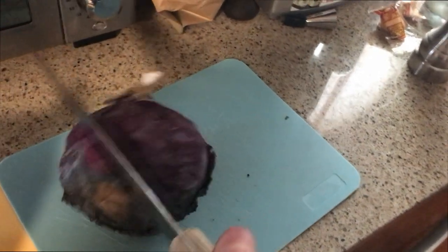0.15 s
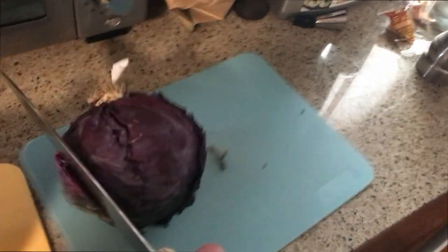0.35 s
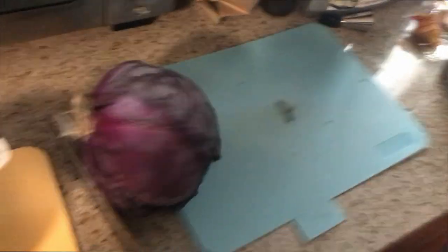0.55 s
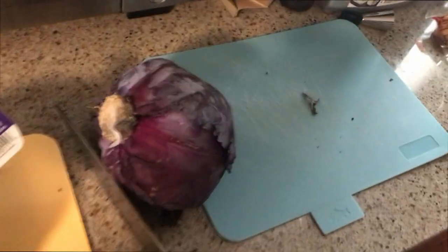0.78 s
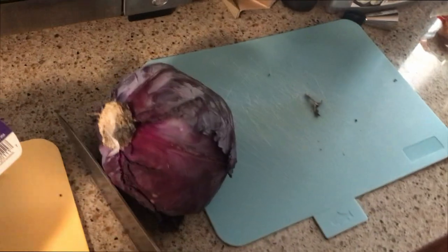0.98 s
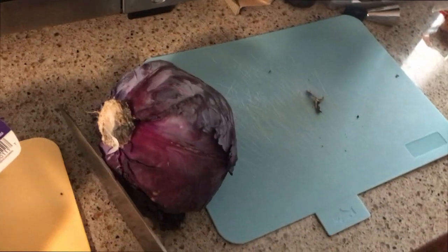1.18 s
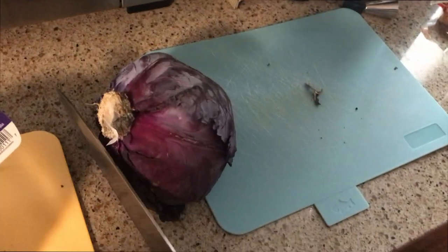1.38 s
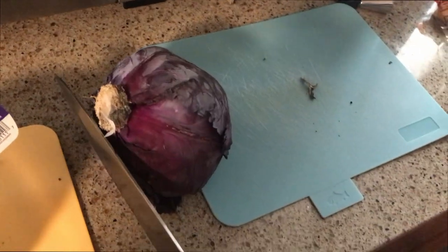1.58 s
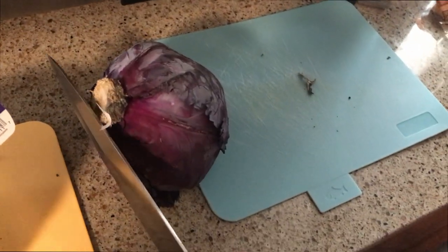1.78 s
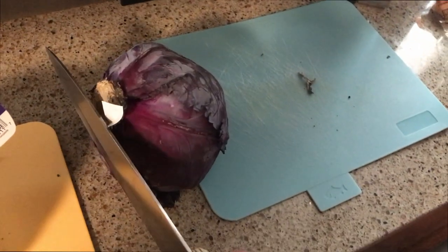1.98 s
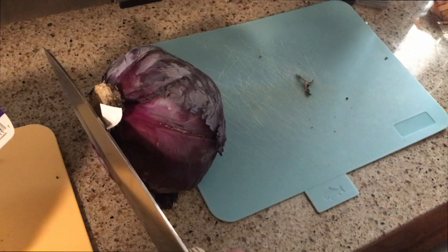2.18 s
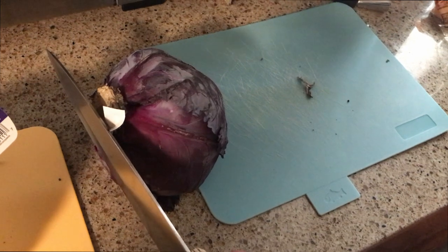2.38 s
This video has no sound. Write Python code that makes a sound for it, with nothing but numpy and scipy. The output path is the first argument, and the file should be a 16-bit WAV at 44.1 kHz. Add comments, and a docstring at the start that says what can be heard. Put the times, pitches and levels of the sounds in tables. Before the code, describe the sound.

Close up in a small kitchen with a low hum, a blade crunches and squeaks into cabbage, clacks loudly on the board, leaves tear and rustle, another sharp clack, then near quiet with tiny leaf creaks.

```python
"""A low hum and a gritty, squeaking crunch come first: a large knife splits a cabbage in a small kitchen.
The edge knocks hard on a plastic board and the steel rings; the cabbage rolls over with a rustle, then a second knock.
Leaves creak and tick faintly on the blade while the hum sinks in pitch. Coloured noise makes the air, clacks and ticks,
random grains the crunch, rustle and creak, decaying sines the ring and thud. A limiter holds down the knocks."""
import sys
import numpy as np
from scipy import signal
from scipy.fft import rfft, irfft, next_fast_len
from scipy.io import wavfile
from scipy.ndimage import uniform_filter1d, minimum_filter1d, map_coordinates

SR = 44100
rng = np.random.default_rng(int(sys.argv[2]) if len(sys.argv) > 2 else 0)


def waveform_to_disk(signal):
    """Save audio, clipped to [-1, 1], as 16-bit WAV at the path in sys.argv[1]."""
    frames = np.transpose(np.atleast_2d(signal))
    scaled = np.clip(frames, -1, 1) * 32767
    samples = np.round(scaled).astype(np.int16)
    wavfile.write(sys.argv[1], SR, samples)


N = 108045  # samples

# Level of the blade splitting the leaves: start_s, level_db
CUT_LEVEL = [(0, -53.5), (.02, -45.5), (.055, -42.5), (.1, -43), (.125, -39.5), (.148, -32), (.168, -35.5),
             (.184, -30), (.198, -40), (.215, -68)]
# Colour of splitting leaves and ribs: frequency_hz, relative level_db per Hz
CRUNCH_COLOUR = [(150, -9.5), (700, -10), (1600, -4), (2300, -2.5), (3300, 1.5), (5500, -3.5), (9000, -4.5),
                 (10500, -10), (13000, -4.5), (15500, -15)]
# Faint after-ring of the blade's free end: pitch_hz, t60_s, first_knock_db, second_knock_db
AFTER_RING = [(952, .42, -36, -45), (1781, .4, -40, -50), (7926, .4, -56, -50), (10840, .42, -46, -78),
              (11010, .4, -70, -58), (13400, .38, -70, -61)]

# random phase wobble roughens the ring of the steel
RING_WOBBLE_RAD, RING_WOBBLE_PER_S = 0.59, 100
SLOW_RISE_S = 0.0049  # build-up of the room, the after-ring, the tear and the brushes


def amp(db):
    """Decibels to gain."""
    return 10 ** (np.asarray(db) / 20)


def unit(x):
    """Scale to rms 1."""
    return x / np.sqrt(np.mean(x ** 2) + 1e-20)


def along(points, hz):
    """Interpolate (Hz, value) points on a log frequency axis."""
    point_hz, values = np.transpose(points)
    return np.interp(np.log(hz + 1), np.log(point_hz + 1), values)


def clock():
    """Time of each sample in seconds."""
    return np.arange(N) / SR


def curves(rows):
    """One value per sample for each column after the time."""
    s, *columns = np.transpose(rows)
    return [np.interp(clock(), s, column) for column in columns]


def wobble(rate):
    """A smooth random curve through rate knots a second."""
    knots = rng.standard_normal(N // 20)
    return map_coordinates(knots, [clock() * rate], mode="wrap")


def fade(s, t60, rise):
    """An envelope that rises at s and dies away by 60 dB in t60 seconds."""
    t = np.maximum(clock() - s, 0)
    decay = np.exp(-np.log(1000) * t / t60)
    return decay * (1 - np.exp(-t / rise))


def filtered(x, gain):
    """Multiply the spectrum of x by a gain that depends on frequency."""
    size = next_fast_len(N + SR // 2)
    hz = np.fft.rfftfreq(size, 1 / SR)
    return irfft(rfft(x, size) * gain(hz), size)[:N]


def tone(hz, wobble_rad=0):
    """A sine of random starting phase, roughened by a random phase wobble."""
    phase = 2 * np.pi * (hz * clock() + rng.random())
    return np.sin(phase + wobble_rad * wobble(RING_WOBBLE_PER_S))


def noise(spectrum, tilt_db=0):
    """Coloured noise of rms 1, tilted by tilt_db per octave."""
    def colour(hz):
        return amp(along(spectrum, hz) + tilt_db * np.log2(hz + 1))
    return unit(filtered(rng.standard_normal(N), colour))


def grains(spectrum, rate, spread_db):
    """Tiny fractures of uneven size at random moments, rate a second on average; rms 1."""
    happens = rng.random(N) < rate / SR
    size = amp(spread_db * np.clip(rng.standard_normal(N), -2, 2))
    pops = happens * rng.standard_normal(N) * size
    return unit(filtered(pops, lambda hz: amp(along(spectrum, hz))))


def patchy(x, depth_db):
    """Rubbing leaves sing briefly: random patches of time and pitch rise and fall in level; rms 1."""
    z = signal.stft(x, nperseg=256)[2]
    field = uniform_filter1d(rng.standard_normal(z.shape), size=3, axis=0)
    field = uniform_filter1d(field, size=3, axis=1)
    patches = amp(depth_db * np.clip(unit(field), -2, 2))
    return unit(signal.istft(z * patches, nperseg=256)[1][:N])


def kitchen(x):
    """The room's answer: a noise tail of unit energy in which each band dies at its own rate."""
    # Reverberation of the small room: frequency_hz, t60_s
    room_decay = [(120, 0.85), (250, 0.26), (500, .42), (1500, .5), (4000, 0.47), (8000, 0.31),
                  (11000, .33), (15000, 0.17)]
    hz, t, z = signal.stft(rng.standard_normal(SR), SR, nperseg=256)
    decay = np.exp(-np.log(1000) * t / along(room_decay, hz)[:, None])
    build = 1 - np.exp(-t / SLOW_RISE_S)
    tail = signal.istft(z * decay * build, SR, nperseg=256)[1]
    return signal.fftconvolve(x, tail / np.linalg.norm(tail))[:N]


def low_hum():
    """A wavering sine that sinks in pitch, its octave, and a higher hum that takes over."""
    # Low hum before its random waver: start_s, pitch_hz, level_db (rms)
    hum_track = [(0, 69.1, -40.5), (.18, 68.3, -42), (.35, 63.9, -44.5), (.53, 63.5, -37.5),
                 (.68, 62.23, -47), (.82, 60.6, -54.5), (.98, 61.27, -48.5), (1.1, 60.8, -51),
                 (1.36, 60.43, -51), (1.56, 59.5, -60), (1.95, 60.05, -57.5), (2.1, 60.88, -71),
                 (2.45, 59.9, -75)]
    octave_db = -19.5  # relative to the median level of the hum
    drone_s, drone_hz, drone_db, drone_rise_s = 1.93, 87.5, -61, 0.12
    hz, level_db = curves(hum_track)
    phase = 2 * np.pi * np.cumsum(hz) / SR
    hum = amp(level_db + .7 * wobble(12)) * np.sin(phase)
    octave = amp(np.median(level_db) + octave_db + 0.67 * wobble(18)) * np.sin(2 * phase)
    drone_swell = np.clip((clock() - drone_s) / drone_rise_s, 0, 1)
    drone = amp(drone_db + wobble(3.4)) * drone_swell * tone(drone_hz)
    return np.sqrt(2) * (hum + octave + drone)  # a sine of rms 1 peaks at root two


def room_air():
    """Steady room air as coloured noise, with a thin narrow-band hiss of the microphone."""
    # Colour of the room air: frequency_hz, relative level_db per Hz
    air_colour = [(20, -21.5), (32, -10.5), (48, 3), (110, 2.5), (180, -12), (350, -15), (700, -21.5),
                  (1500, -27.5), (4000, -31), (10000, -36.5), (15500, -36)]
    air_db = -61
    hiss_hz, hiss_half_width_hz, hiss_db = 12050, 220, -82.5

    def narrow(f):
        return 1 / (1 + ((f - hiss_hz) / hiss_half_width_hz) ** 2)
    hiss = unit(filtered(rng.standard_normal(N), narrow))
    return amp(air_db) * noise(air_colour) + amp(hiss_db) * hiss


def creaking():
    """The blade leans on the leaves: short noise ticks, and soft swells of grains as they rub."""
    # Leaves ticking against the blade: start_s, level_db, treble_tilt_db per octave
    tick_list = [(1.4498, -55.5, 4.5), (1.6614, -61, 2), (1.684, -46, -12), (1.6949, -50, 11),
                 (1.717, -52, 1), (1.7352, -58, -7), (1.741, -58, 4), (1.758, -54, -2), (1.7765, -52, 4),
                 (1.783, -59, 3), (1.803, -53, -5.5), (1.8101, -47.5, -1), (2.0095, -55, 3),
                 (2.016, -56, 3), (2.0715, -56.5, 4), (2.0954, -46.5, 0), (2.1105, -52, 1),
                 (2.1786, -50, -1)]
    # Colour of a tick before its tilt: frequency_hz, relative level_db per Hz
    leaf_colour = [(100, -37), (600, -28), (1900, -14), (2750, 3.5), (3500, 4), (4200, -9), (4800, -7),
                   (5800, 5.5), (7800, 1.5), (10500, -11.5), (12800, -1.5), (15500, -18)]
    # Leaves rubbing the blade: centre_s, half_length_s, level_db
    rub_list = [(.602, .008, -63), (1.208, 0.024, -73), (1.409, 0.034, -72.5), (1.594, .03, -69.5),
                (1.692, .018, -69), (1.764, 0.061, -70), (2.08, .03, -75), (2.33, 0.044, -81)]
    # Colour of the rubbing: frequency_hz, relative level_db per Hz
    rub_colour = [(100, -35), (500, -18), (1500, -10.5), (2800, 3), (5500, -7), (9000, -8), (15000, -15)]
    tick_t60_s, tick_rise_s = .013, 0.00031
    ticks = sum(amp(db) * fade(s, tick_t60_s, tick_rise_s) * noise(leaf_colour, tilt_db)
                for s, db, tilt_db in tick_list)
    rub_level = sum(amp(db) * np.exp(-((clock() - s) / half) ** 2) for s, half, db in rub_list)
    return ticks + rub_level * grains(rub_colour, rate=1100, spread_db=2.5)


def brushes():
    """The blade brushes the cabbage; soft touches wake only two low modes of the steel."""
    # Soft touches: start_s, level_db
    touch_list = [(.412, -44.5), (.572, -55.5)]
    level = sum(amp(db) * fade(s, .2, SLOW_RISE_S) for s, db in touch_list)
    lower_mode = tone(AFTER_RING[0][0], RING_WOBBLE_RAD)
    upper_mode = tone(AFTER_RING[1][0], RING_WOBBLE_RAD)
    return level * (lower_mode + amp(-0.5) * upper_mode)


def rolling():
    """The cabbage rolls over: waxy outer leaves rustle and chirp over the board as patchy grains."""
    # Rustle of the roll: start_s, level_db
    roll_level = [(.37, -66), (.415, -46.5), (.435, -47), (.453, -42.5), (.475, -51), (.51, -65.5),
                  (.62, -68.5), (.65, -58.5)]
    # Colour of the rustle: frequency_hz, relative level_db per Hz
    rustle_colour = [(200, -11), (900, -5), (1800, 2.5), (3200, -6.5), (6000, -1), (7500, -10), (9400, -7),
                     (10600, -17.5), (15000, -16.5)]
    level_db, = curves(roll_level)
    moving = (clock() > roll_level[0][0]) & (clock() < roll_level[-1][0])
    rustle = patchy(grains(rustle_colour, rate=4000, spread_db=3), depth_db=6)
    return amp(level_db) * moving * rustle


def tearing():
    """Loose leaves tear away after the first knock: a dying burst of bright grains."""
    # Colour of the tear: frequency_hz, relative level_db per Hz
    tear_colour = [(300, -13), (2000, -2), (6000, 0), (9000, 1.5), (11000, -1), (15500, -5.5)]
    start_s, level_db, t60_s = 0.25, -32.5, 0.21
    envelope = amp(level_db) * fade(start_s, t60_s, SLOW_RISE_S)
    return envelope * grains(tear_colour, rate=3000, spread_db=3)


def snapping():
    """Single ribs snap: short bursts of patchy, slightly darkened crunch noise."""
    # Ribs snapping: start_s, level_db
    snap_list = [(0.0313, -37), (0.0428, -23.5), (0.0842, -36), (.0890, -38.5), (0.1481, -26.5),
                 (0.158, -25.5), (0.1828, -31.5), (.310, -30), (0.362, -60.5), (.383, -40), (.444, -38.5),
                 (0.457, -42.5)]
    level = sum(amp(db) * fade(s, .014, rise=0.00014) for s, db in snap_list)
    return level * patchy(noise(CRUNCH_COLOUR, tilt_db=-1.14), depth_db=2)


def squeaking():
    """Wet leaves grip the steel and squeak: a narrow noise band around a rising pitch."""
    # Squeak: start_s, pitch_hz, level_db
    squeak_track = [(0, 2300, -63.5), (.016, 2300, -48), (.056, 2350, -45), (.075, 2900, -54.5),
                    (.12, 3100, -50.5), (.15, 3250, -41.5), (.19, 3250, -43), (.21, 3200, -70.5)]
    width_hz = 400
    hz, level_db = curves(squeak_track)
    phase = 2 * np.pi * np.cumsum(hz) / SR
    return amp(level_db) * (wobble(width_hz) * np.sin(phase) + wobble(width_hz) * np.cos(phase))


def crunching():
    """The blade splits the leaves in a gritty stream of tiny fractures."""
    level_db, = curves(CUT_LEVEL)
    return amp(level_db) * patchy(grains(CRUNCH_COLOUR, rate=7000, spread_db=2), depth_db=3.5)


def cutting():
    """Crunch and squeak stop together as the cut ends; snaps and the tear follow their own times."""
    blade_in_cabbage = clock() < CUT_LEVEL[-1][0]
    return (crunching() + squeaking()) * blade_in_cabbage + snapping() + tearing()


def edge_contacts():
    """The hard edge bounces on the board: sudden noise bursts with a little of the room."""
    # Contacts of the edge: start_s, level_db, t60_s
    contact_list = [(0.1996, -5.5, .008), (0.2017, -10.5, .014), (0.2276, -20, .07), (0.6523, -17.5, .006),
                    (0.688, -44.5, .025)]
    # Colour of a contact: frequency_hz, relative level_db per Hz
    edge_colour = [(300, -17), (1200, -2.5), (2800, 0), (6000, -0.5), (9000, 0.5), (10500, -9),
                   (15500, -11.5)]
    level = sum(amp(db) * fade(s, t60, rise=.0001) for s, db, t60 in contact_list)
    edge = noise(edge_colour) * level
    return edge + amp(-17) * kitchen(edge)


def counter_thud(s):
    """The counter answers a knock with a few low decaying modes."""
    # Modes of the counter: pitch_hz, relative level_db, t60_s
    counter_modes = [(117.7, -5, 0.26), (143.6, -2, .22), (201, -10.5, .25), (262, -9, .18)]
    return sum(amp(db) * tone(hz) * fade(s, t60, rise=0.0099) for hz, db, t60 in counter_modes)


def board_clack(s, t60, tilt_db):
    """The plastic board on the counter clacks: a coloured noise burst."""
    # Colour of the board before its tilt: frequency_hz, relative level_db per Hz
    board_colour = [(30, -35), (100, -17.5), (190, -12.5), (280, -6.5), (420, -0.5), (560, -6), (740, -3.5),
                    (950, 3.5), (1300, -3.5), (1600, 4), (2400, 1), (3200, -0.5), (4800, -3.5), (6300, -1),
                    (8500, -7.5), (10500, -12.5), (15000, -15)]
    return noise(board_colour, tilt_db) * fade(s, t60, rise=0.000067)


def blade_ring(knock, s, rise):
    """The steel rings in many modes, excited differently at each point of contact."""
    # Modes of the blade: pitch_hz, t60_s, relative first_knock_db, relative second_knock_db
    blade_modes = [(952, .035, -11.5, -11.5), (941.5, .1, -10.5, -19), (1779, .125, -9, -12),
                   (2128, 0.11, -26.5, -28), (2426, 0.033, -13.5, -11), (2883, .08, -24.5, -21),
                   (3147, 0.13, -24, -31), (3545, 0.083, -21, -21.5), (4175, 0.2, -23.5, -37),
                   (4433, .11, -25, -44), (5670, .08, -22, -31.5), (6306, 0.065, -25, -27),
                   (7030, .07, -23, -37), (7840, .15, -31, -31.5), (8820, .08, -18.5, -55),
                   (9461, 0.18, -42.5, -41), (10820, 0.12, -23, -49), (11520, .07, -34, -25.5),
                   (12630, 0.13, -24.5, -34), (13200, .12, -46.5, -35.5)]
    return sum(amp(levels[knock]) * tone(hz, RING_WOBBLE_RAD) * fade(s, t60, rise)
               for hz, t60, *levels in blade_modes)


def blade_after_ring(knock, s):
    """The free end of the blade rings on faintly, with twice the phase wobble."""
    return sum(amp(levels[knock]) * tone(hz, 2 * RING_WOBBLE_RAD) * fade(s, t60, SLOW_RISE_S)
               for hz, t60, *levels in AFTER_RING)


def knocks():
    """Steel meets the board: hard contacts, clack, ring and thud, with the room behind clack and ring."""
    # Knocks: start_s, ring_db, ring_rise_s, clack_db, clack_t60_s, treble_tilt_db per octave, thud_db, room_db
    knock_list = [(.1997, 5, 0.0027, -11.5, 0.14, -0.25, -26, -8),
                  (.6515, 2, 0.00063, -8.5, 0.04, -1.8, -38.5, -14)]
    ring_room_db = -13  # the ring's share of the room, relative to the clack's
    out = edge_contacts()
    for k, (s, ring_db, rise, clack_db, clack_t60, tilt_db, thud_db, room_db) in enumerate(knock_list):
        ring = amp(ring_db) * blade_ring(k, s, rise)
        clack = amp(clack_db) * board_clack(s, clack_t60, tilt_db)
        thud = amp(thud_db) * counter_thud(s)
        room = amp(room_db) * kitchen(clack + amp(ring_room_db) * ring)
        out = out + ring + clack + thud + blade_after_ring(k, s) + room
    return out


def scene():
    """Knife, cabbage and board in the kitchen, over hum and room air."""
    background = low_hum() + room_air()
    creaks = creaking()
    leaves = rolling() + cutting()
    room = kitchen(amp(-10.5) * leaves + amp(-18.5) * creaks)
    return (background + room + creaks + brushes() + leaves + knocks())[None]


def record(dry):
    """A fast limiter holds the peaks down, then a steep low-pass limits the band."""
    ceiling_db, top_hz = -0.65, 15700
    need = np.minimum(1, amp(ceiling_db) / (np.abs(dry[0]) + 1e-9))
    # lowest gain needed nearby, then smoothed; both windows in samples
    gain = uniform_filter1d(minimum_filter1d(need, size=161), size=161)
    return filtered(dry[0] * gain, lambda hz: 1 / np.sqrt(1 + (hz / top_hz) ** 160))[None]


dry = scene()
out = record(dry)
waveform_to_disk(out)
```